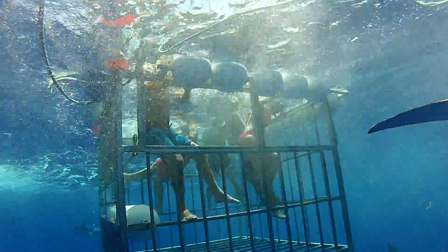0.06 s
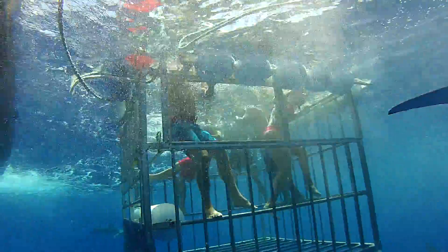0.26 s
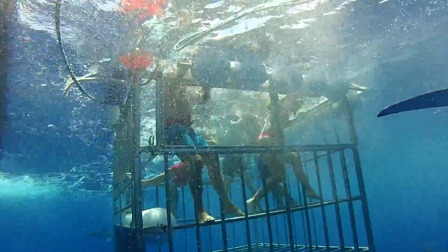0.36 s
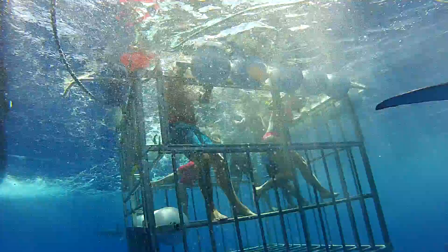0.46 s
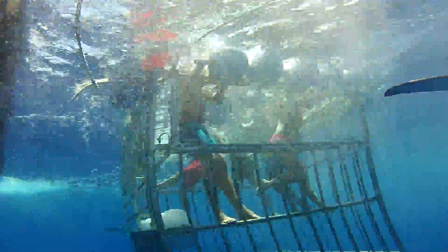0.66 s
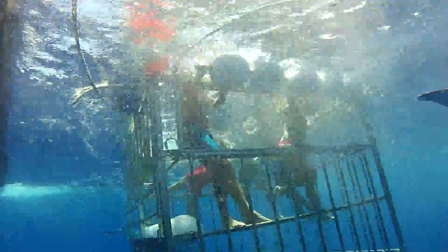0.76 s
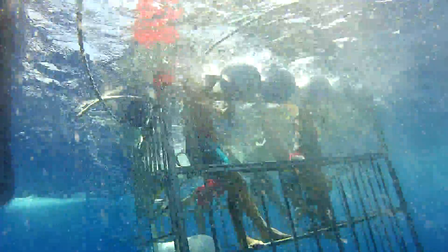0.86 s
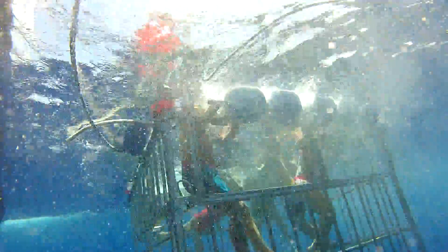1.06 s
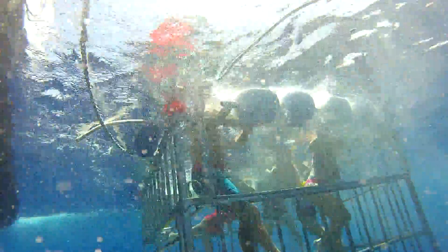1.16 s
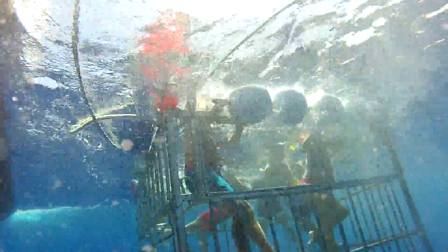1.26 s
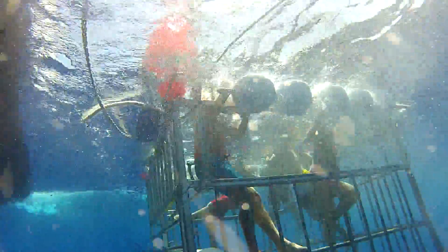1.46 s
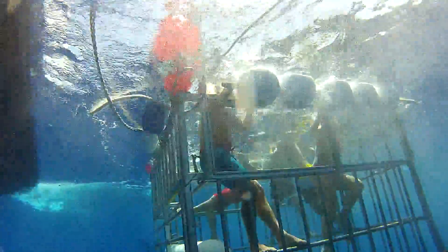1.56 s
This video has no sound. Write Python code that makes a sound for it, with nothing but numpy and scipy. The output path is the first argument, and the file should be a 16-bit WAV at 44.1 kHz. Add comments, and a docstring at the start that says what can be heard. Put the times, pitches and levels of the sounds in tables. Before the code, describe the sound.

Knocks on a submerged camera housing, close and muffled. Faint taps over low wash and deep rumble lead to a loud, hollow, slightly overloaded knock at 0.23 s, with smaller bumps ringing down until 0.45 s. After a lull, low water slaps thump at 0.68-0.81 s with a sharp spray burst at 0.75 s. Then bubble pips, light taps, including one near 1.2 s, and gently rising wash until 1.6 s.

```python
"""Under water beside a steel cage: a sealed housing is knocked and rings in damped low and middle modes.
A surge slaps it with heavily damped sine thumps and spray of coloured noise bursts; slow sways follow blows.
Small bubbles pip as short decaying sines; lumpy noise washes over a deep rumble.
A soft overload rounds the peaks; a coarse sample-and-hold then mirrors the sound around its rate."""
import sys
import numpy as np
from scipy import signal
from scipy.fft import rfft, irfft
from scipy.io import wavfile

SR = 44100
rng = np.random.default_rng(int(sys.argv[2]) if len(sys.argv) > 2 else 0)


def to_wav(s):
    """Save 16-bit WAV."""
    ch = np.atleast_2d(s).T  # columns
    pcm = np.round(np.clip(ch, -1, 1) * 32767)  # PCM
    wavfile.write(sys.argv[1], SR, pcm.astype(np.int16))


N = 70560

# Wash and deep rumble colours, relative: f/Hz, density/dB per Hz
WASH_COLOUR = [(65, -37.5), (110, 0.5), (151, -15.5), (197, -12.5), (506, -5), (559, -1), (705, -18),
               (792, -12), (890, -27), (1280, -27.5), (1700, -30.5), (2840, -34), (5000, -38.5),
               (5800, -29), (7540, -80), (12800, -120)]
RUMBLE_COLOUR = [(15, -29), (27, 12), (45, -11.5), (63, 5.5), (85, -24), (120, -42)]
# Level courses, wash before WASH_LIFT_DB: t/s, level/dB
WASH_COURSE = [(0.0, -55.5), (0.672, -53.5), (0.824, -51.5), (1.06, -50), (1.344, -50), (1.6, -47)]
RUMBLE_COURSE = [(0, -38.5), (.08, -43), (.14, -45), (.225, -43.5), (.25, -32), (.45, -42.5), (.6, -46),
                 (.675, -42.5), (.72, -29), (.88, -42.5), (1.16, -63), (1.21, -45), (1.33, -65), (1.6, -51)]
# Bubble pips: t/s, level/dB before the soft rise, f/Hz, t60/s
BUBBLES = [(0.7777, -37.5, 2600, 0.011), (0.792, -32, 2630, 0.0063), (0.805, -28, 2670, 0.006),
           (.8325, -39.5, 2090, 0.045), (0.962, -49, 1850, .03), (1.084, -38, 2600, 0.0057),
           (1.099, -51, 2800, .015), (1.2057, -41.5, 2184, 0.031), (1.283, -36.5, 2660, 0.0083),
           (1.3259, -55.5, 2320, .03), (1.359, -50, 3770, 0.024), (1.4176, -39.5, 2447, 0.031),
           (1.520, -51.5, 3670, 0.018), (1.557, -52.5, 3810, 0.03), (1.5673, -50, 2520, .04)]
# Spray bursts, and a short overload click at the main knock (0.239 s):
# t/s, rise/s, hold/s, t60/s, level/dB before tilt and flicker, tilt/dB per octave of f + 600 Hz
NOISE_BURSTS = [(0.225, 0.0023, 0.0076, .02, -35.5, -20.5), (0.239, .0007, .0005, 0.0079, -42.5, 2.5),
                (0.243, 0.0025, 0.019, 0.42, -74.5, -14.5), (0.679, 0.005, 0.0083, 0.019, -35.5, 3.5),
                (0.698, 0.0022, 0.012, 0.029, -43.5, 5), (0.722, 0.0035, 0.032, 0.058, -54, -20),
                (0.741, 0.0042, .018, 0.022, -36.5, -3), (0.75, 0.0041, 0.0045, 0.017, -20, -2),
                (0.779, 0.0077, 0.036, 0.087, -39, -19), (0.827, 0.0033, 0.021, 0.035, -45, -13.5),
                (0.925, 0.0012, .005, 0.059, -54, -6), (1.184, 0.00067, 0.0081, 0.051, -58, -25),
                (1.283, 0.0045, .01, 0.045, -54, -7), (1.513, 0.0056, 0.024, 0.24, -57.5, -7.5)]
# Burst colour before tilt, relative: f/Hz, density/dB per Hz
BURST_COLOUR = [(150, -42.5), (350, -7), (700, -11.5), (1000, -5.5), (1300, -8), (1750, -5.5),
                (2400, -14.5), (3200, -11), (4500, -23), (5500, -19.5)]
# Water slaps before softening: t/s, level/dB, f/Hz, t60/cycles (negative: silent), push +1 or pull -1
WATER_SLAPS = [(.680, -0.5, 74.2, 5.5, -1), (0.7059, -4.5, 67.8, 4, 1), (0.742, -9, 75.6, 10, 1),
               (0.755, 2, 111, 3, -1), (0.779, -19.5, 81, 14, 1), (0.791, -15.5, 60, -2, 1),
               (0.81, -14, 67.5, 3.5, 1)]
# Slow sway after a blow, before softening: t/s, level/dB
SWAY_STARTS = [(0.241, -31.5), (0.798, -25.5)]
# Knocks on the housing: t/s, boom level/dB, middle ring level/dB, upper ring level/dB, rise/s
HOUSING_KNOCKS = [(0.02, -32, -53, -46, 0.0013), (0.045, -62.5, -33, -30.5, 0.0021),
                  (0.068, -61.5, -48, -42.5, 0.0012), (0.156, -41.5, -48, -56, 0.0044),
                  (.203, -59, -65, -56, 0.0054), (0.2284, -1, -2, 3.5, 0.0055),
                  (.2392, -16, -9, -20, 0.0025), (0.267, -9, -18.5, -16.5, 0.0006),
                  (0.295, -11, -25, -9, 0.0073), (0.319, -21.5, -12.5, -19.5, 0.0028),
                  (.355, -16.5, -18.5, -26.5, 0.0058), (0.386, -24, -52.5, -23.5, 0.014),
                  (0.419, -18.5, -24.5, -25.5, 0.0084), (0.544, -45.5, -55, -57, 0.0026),
                  (.588, -71, -70, -35, 0.0011), (0.623, -65, -52, -37, .004),
                  (0.683, -57, -36, -22.5, 0.00074), (0.699, -54, -26.5, -26.5, .002),
                  (0.799, -23.5, -24, -24, 0.00033), (0.834, -67, -55, -17, 0.003),
                  (.858, -36.5, -55, -34, 0.002), (0.924, -58, -49, -28.5, 0.0031),
                  (0.962, -74, -39, -37, 0.0025), (1.045, -45.5, -46, -43, 0.0029),
                  (1.088, -70, -45, -30, 0.0046), (1.169, -40, -50, -35, 0.0017),
                  (1.199, -22.5, -21, -27, 0.00059), (1.259, -34.5, -73, -56, 0.0023),
                  (1.369, -28, -32.5, -27, 0.0016), (1.413, -71, -35, -48, 0.0011),
                  (1.448, -78, -57, -27, 0.0055), (1.515, -32, -36, -36, 0.0016),
                  (1.550, -69, -40, -30, 0.006)]
# Paired low modes, then higher modes; levels add to the knock's: f/Hz, level/dB, t60/s
BOOM_MODES = [(124.27, 3.5, 0.17), (138.3, 0.5, 0.14)]
RING_MODES = [(243.3, -18, 0.26), (294.7, -13.5, 0.22), (354.2, -3, 0.077), (438, -12.5, 0.12),
              (509.4, 2.5, 0.062), (534.7, -16, 0.25), (627, -24, 0.097), (776.6, -31, 0.096),
              (1001, -26.5, 0.057), (1242, -38.5, 0.019), (1890, -48.5, .015)]

WASH_LIFT_DB, WASH_PATCHY_DB, RUMBLE_PATCHY_DB = 1.5, 2.5, 4.5
STEADY_ABOVE_HZ = 730  # nominal; rounded to a third-octave band edge
PIP_RISE_S = 0.00057
SPRAY_PATCHY_DB, SPRAY_FLICKER_DB, SPRAY_FLICKER_HZ = 2.5, 2.7, 120.0
SWAY_HZ, SWAY_T60_S, SLAP_SOFT_HZ = 28, 0.7, 363
STRIKE_SPREAD_DB, UPPER_FROM_HZ = 1.5, 460
DULLING = 0.12  # loss per cycle of rise, higher modes
KNEE, TOP = 0.75, 0.96  # overload onset and ceiling, full scale = 1
GUARD_HZ, HOLD_HZ, STOPBAND_HZ = 5106, 12000, 15923.8


def amp(db):
    """dB to gain."""
    return 10 ** (np.asarray(db) / 20)


def level(rows):
    """Gain course, linear in dB between (t/s, level/dB) rows."""
    s, db = np.transpose(rows)
    return amp(np.interp(np.arange(N) / SR, s, db))


def drift(rate_hz):
    """Slow random course of spread 1: white noise through two equal poles at rate_hz."""
    step = 40  # samples per slow value
    pole = np.exp(-2 * np.pi * rate_hz * step / SR)
    white = rng.standard_normal(N // step + 1002)
    slow = signal.lfilter([1], [1, -2 * pole, pole * pole], white)[1000:]  # settled part
    return np.interp(np.arange(N) / step, np.arange(len(slow)), slow / slow.std())


def noise(spectrum, patchy_db):
    """Coloured noise of rms 1; low third-octave bands flicker independently, the top band is steady."""
    hz = np.fft.rfftfreq(N, 1 / SR) + 1  # +1 avoids log 0
    at_hz, db = np.transpose(spectrum)
    colour = amp(np.interp(np.log(hz), np.log(at_hz), db))
    coloured = rfft(rng.standard_normal(N)) * colour
    band = np.clip(np.round(3 * np.log2(np.minimum(hz, STEADY_ABOVE_HZ) / 25)), 0, 16)
    out = np.zeros(N)
    for k in range(17):
        flicker_db = patchy_db * drift(10.0) * (k < band.max())
        out += irfft(coloured * (band == k), N) * amp(flicker_db)
    return out / out.std()


def ring(s, gain, hz, t60_s, rise_s):
    """Damped mode: a sine from s, swelling and decaying exponentially; returns its place and samples."""
    stop = min(int((s + 1.2 * t60_s) * SR), N)
    place = slice(int(s * SR), stop)
    t = np.clip(np.arange(place.start, place.stop) / SR - s, 0, None)
    swell = 1 - np.exp(-t / max(rise_s, 1e-5))
    decay = amp(-60 * t / t60_s)
    return place, gain * swell * decay * np.sin(2 * np.pi * hz * t)


def mix(rings):
    """Sum of placed rings."""
    out = np.zeros(N)
    for place, samples in rings:
        out[place] += samples
    return out


def wash():
    """Water wash over deep rumble: two coloured noises on slow level courses."""
    rumble = level(RUMBLE_COURSE) * noise(RUMBLE_COLOUR, RUMBLE_PATCHY_DB)
    water = amp(WASH_LIFT_DB) * level(WASH_COURSE) * noise(WASH_COLOUR, WASH_PATCHY_DB)
    return water + rumble


def pips():
    """Small bubbles, each a brief damped resonance at its own pitch."""
    return mix(ring(s, amp(db), hz, t60_s, PIP_RISE_S) for s, db, hz, t60_s in BUBBLES)


def spray_and_click():
    """Spray and overload click from one grainy noise: fast rise, hold, exponential decay, own tilt."""
    t = np.arange(N) / SR
    octaves = np.log2((np.fft.rfftfreq(N, 1 / SR) + 600) / 1700)  # zero at 1100 Hz
    grains = rfft(noise(BURST_COLOUR, SPRAY_PATCHY_DB))
    out = np.zeros(N)
    for s, rise_s, hold_s, t60_s, db, tilt_db in NOISE_BURSTS:
        attack = np.clip((t - s) / rise_s, 0, 1) ** 2
        decay_db = -60 * np.clip(t - s - rise_s - hold_s, 0, None) / t60_s
        out += attack * amp(db + decay_db) * irfft(grains * amp(tilt_db * octaves), N)
    return out * amp(SPRAY_FLICKER_DB * drift(SPRAY_FLICKER_HZ))


def slaps_and_sways():
    """Slaps as heavily damped sines, plus slow sway after the main knock and the slaps; low-passed soft."""
    thumps = [ring(s, np.sign(sense) * amp(db), hz, cycles / hz, 0)
              for s, db, hz, cycles, sense in WATER_SLAPS]
    sways = [ring(s, amp(db), SWAY_HZ, SWAY_T60_S, 0) for s, db in SWAY_STARTS]
    soften = signal.butter(2, SLAP_SOFT_HZ, fs=SR, output="sos")
    return signal.sosfilt(soften, mix(thumps + sways))


def housing():
    """Knocked housing: boom pair in opposite senses swells and beats; slow rises dull the higher modes."""
    rings = []
    for s, boom_db, middle_db, upper_db, rise_s in HOUSING_KNOCKS:
        for k, (hz, db, t60_s) in enumerate(BOOM_MODES):
            rings.append(ring(s, (-1) ** k * amp(boom_db + db), hz, t60_s, rise_s))
        spread_db = STRIKE_SPREAD_DB * rng.standard_normal(len(RING_MODES))
        for k, (hz, db, t60_s) in enumerate(RING_MODES):
            knock_db = upper_db if hz > UPPER_FROM_HZ else middle_db
            gain = amp(knock_db + db + spread_db[k]) / (1 + DULLING * hz * rise_s)
            rings.append(ring(s, (-1) ** k * gain, hz, t60_s, rise_s))
    return mix(rings)


def scene():
    """All sources summed at one microphone."""
    return (housing() + slaps_and_sways() + spray_and_click() + pips() + wash())[None]


def record(dry):
    """Rounded overload, guard low-pass, sample-and-hold image under sinc droop, then a steep top cut."""
    over = np.clip(np.abs(dry) - KNEE, 0, None)
    bend = (TOP - KNEE) * np.tanh(over / (TOP - KNEE))
    rounded = np.clip(dry, -KNEE, KNEE) + np.sign(dry) * bend
    guarded = signal.sosfilt(signal.butter(10, GUARD_HZ, fs=SR, output="sos"), rounded)
    # baseband plus its image on both sides of HOLD_HZ
    sampled = guarded * (1 + 2 * np.cos(2 * np.pi * HOLD_HZ * np.arange(N) / SR))
    droop = np.sinc(np.fft.rfftfreq(N, 1 / SR) / HOLD_HZ)
    held = irfft(rfft(sampled) * droop, N)
    return signal.sosfilt(signal.cheby2(20, 80, STOPBAND_HZ, fs=SR, output="sos"), held)


dry = scene()
out = record(dry)
to_wav(out)
```